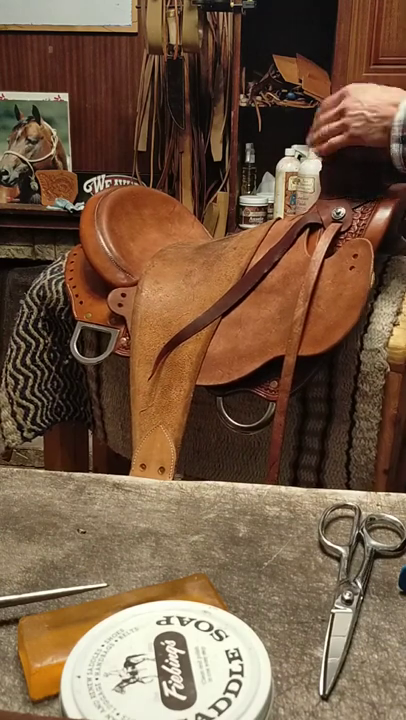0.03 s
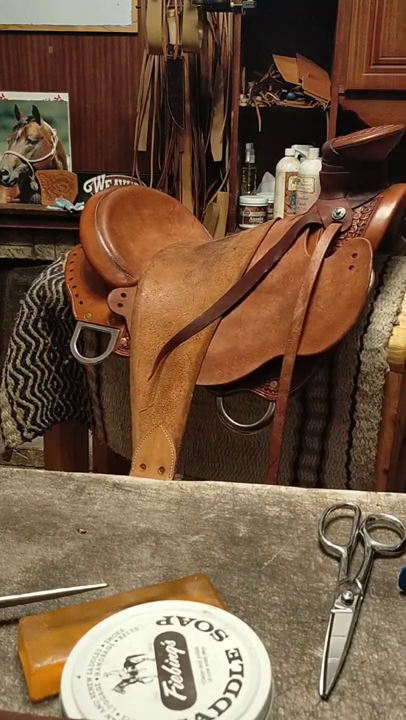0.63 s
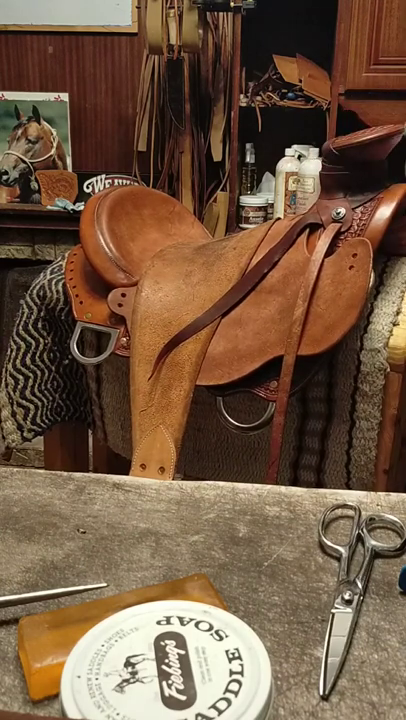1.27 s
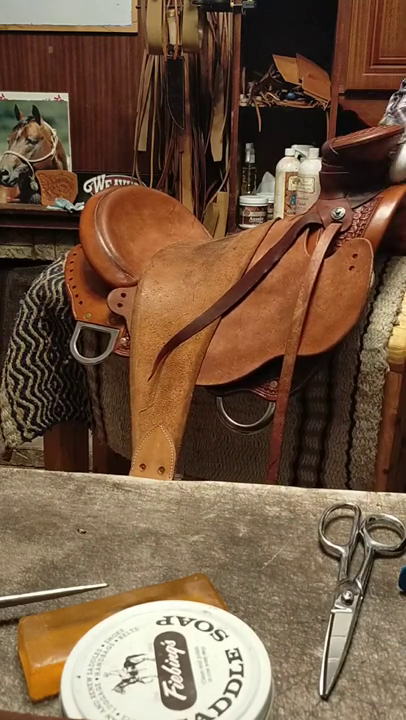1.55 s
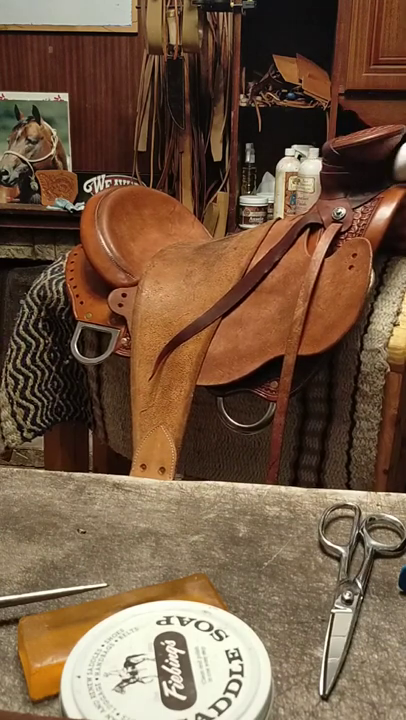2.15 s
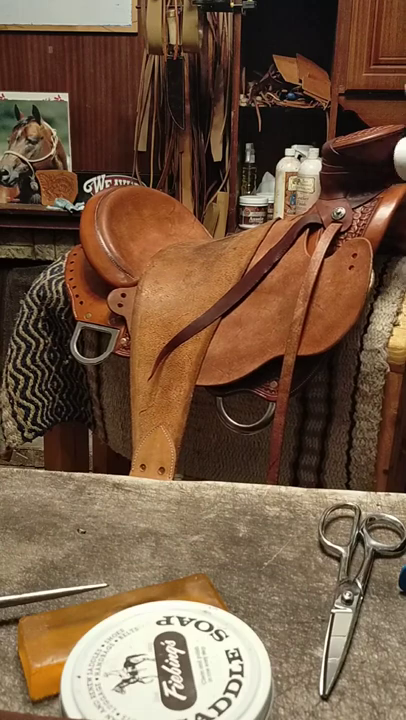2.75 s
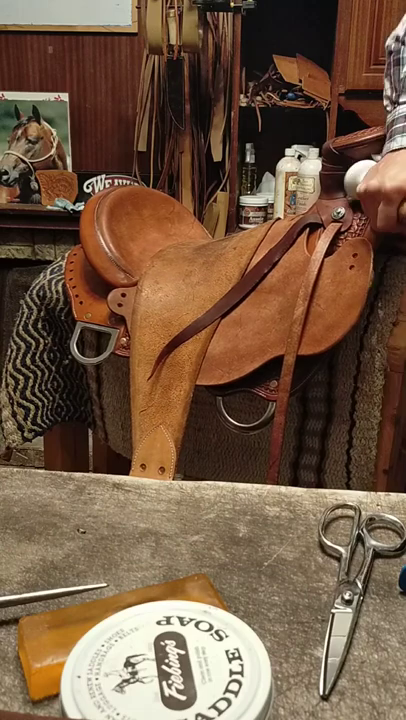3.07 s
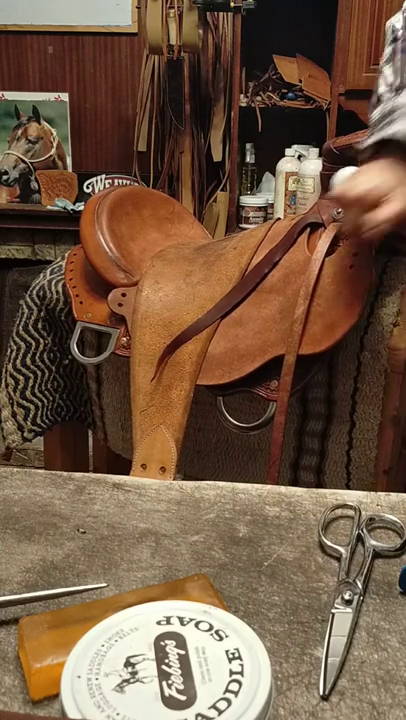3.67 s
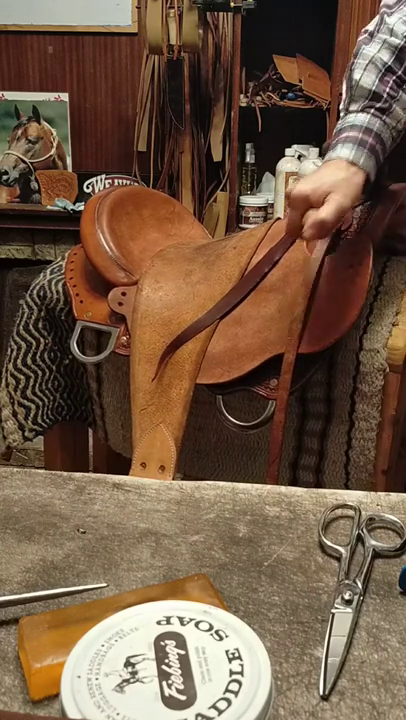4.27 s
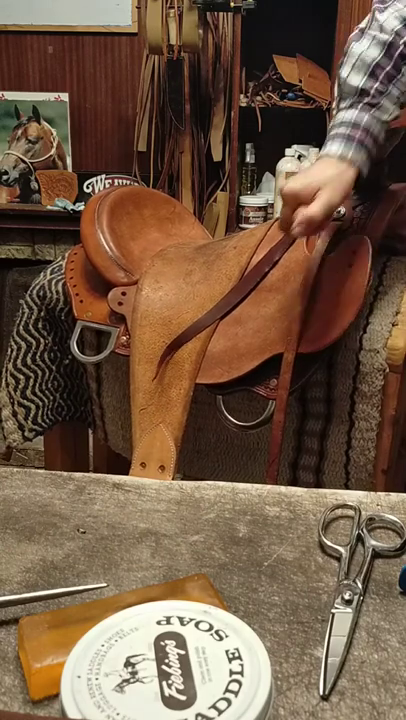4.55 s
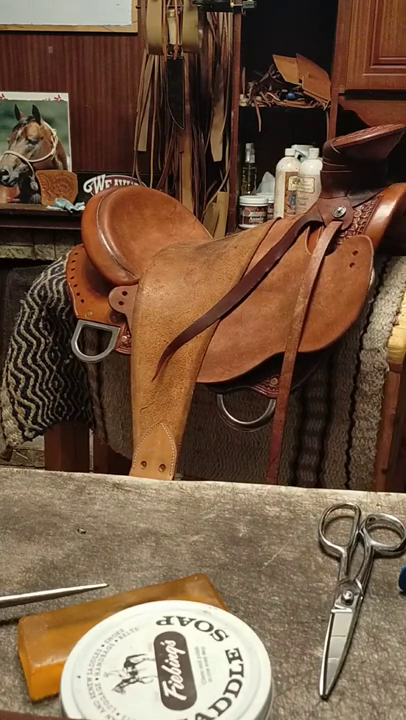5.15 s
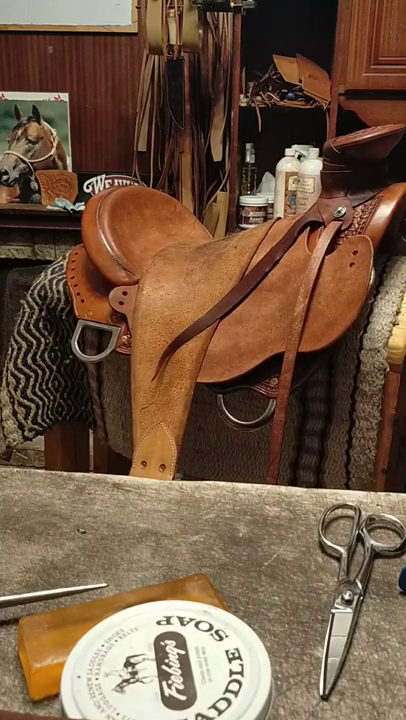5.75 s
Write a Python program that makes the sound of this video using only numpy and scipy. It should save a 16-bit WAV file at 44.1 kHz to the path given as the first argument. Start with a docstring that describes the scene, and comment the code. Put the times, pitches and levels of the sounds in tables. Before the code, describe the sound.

A hard knob taps a leather saddle about a dozen times, hollow knocks growing louder and turning into slaps in a small room.

```python
"""In a small workshop, a doorknob taps a leather saddle: first on the horn, which knocks hollowly,
then along the skirt (the side flap), which slaps. Every blow thuds through the saddle and rocks its
stand, and most of the sound reaches the microphone by bouncing around the room.
A sleeve swishes before the taps, and there are soft bumps and rustles over a quiet hiss."""
import sys
import numpy as np
from scipy import signal
from scipy.fft import rfft, irfft
from scipy.io import wavfile

SR = 44100
rng = np.random.default_rng(int(sys.argv[2]) if len(sys.argv) > 2 else 0)


def log_audio(samples):
    """Write samples as a 16-bit WAV file to the path given in sys.argv[1]."""
    # one column per channel
    frames = np.atleast_2d(samples).T
    # limit to full scale, then quantise
    limited = np.clip(frames, -1, 1)
    pcm = np.round(limited * 32767).astype(np.int16)
    wavfile.write(sys.argv[1], SR, pcm)


N = 261072
TIME = np.arange(N) / SR  # seconds since the start
AGE = np.arange(SR * 7 // 10) / SR  # seconds since a blow

# faint, dry, electrical-sounding ticks (time [s], peak level [dB])
TICK_TIMES = [(.097, -58), (.48, -53), (.543, -56), (0.606, -65), (0.687, -67), (.886, -65), (.923, -66),
              (.982, -68)]
# arm movements (time of top speed [s], rise time [s], rustle level [dB], swish level [dB])
ARM_MOVES = [(0.01, 0.088, -67.5, -72), (.245, .035, -81, -69), (.348, 0.034, -62.5, -54),
             (.41, 0.038, -64.5, -82), (1.1, 0.01, -88, -94), (4.75, 0.99, -77.5, -94),
             (5.32, 0.05, -82.5, -92), (5.4, 0.0098, -82, -76), (5.77, 0.086, -84, -88)]
# soft handling bumps (time [s], level [dB], weight [0 light knock to 1 slow heavy push])
SOFT_BUMPS = [(0.282, -68, 0.65), (.395, -63.5, 1), (.711, -66, 0.09), (.812, -57, 0.49), (1.203, -71, .8),
              (5.239, -76.5, 0), (5.553, -66, 0), (5.592, -59.5, .12)]
# the loose skirt falling back after the knob lifts (time [s], level [dB], scuff level [dB])
SKIRT_FALLS = [(4.138, -55, -84), (4.765, -54, -85), (4.855, -65.5, -73.5), (4.982, -66, -70)]
# hard first contacts of the knob (time [s], level [dB], pitch [Hz], half length [s])
HARD_CONTACTS = [(1.191, -60.5, 1520, 0.001), (1.287, -49.5, 1030, 0.00086), (1.501, -53, 900, 0.00066),
                 (1.727, -46.5, 1400, 0.00027), (1.9557, -38, 1370, 0.00069), (2.197, -42.5, 1310, 0.00087),
                 (2.419, -46.5, 1220, 0.00085), (3.2462, -28.5, 1810, 0.00083),
                 (3.6124, -38.5, 1410, 0.00033), (3.617, -23.5, 1170, 0.00043),
                 (3.9914, -22.5, 1410, 0.00062), (4.316, -16.5, 1360, .00054), (4.6097, -43, 1190, 0.00061),
                 (4.614, -24, 1420, 0.00038)]
# hard contacts are heard more directly than light ones (contact level [dB], room level [dB])
CONTACT_ROOM_LEVELS = [(-60, -78), (-48, -54.5), (-18, -49.5)]
# blows of the knob (time [s], strength [dB], place [0 top of the horn to 1 far skirt],
# pitch the spot favours [Hz], hollowness [0-1])
BLOWS = [(1.2832, -18, .15, 430, 0.2), (1.5, -7, 0.12, 429, .25), (1.736, -3.5, 0.06, 432, 0.26),
         (1.978, 0, 0.05, 434, 0.13), (2.2221, 0.5, 0.17, 433, 0.13), (2.4392, 2, 0.09, 411, 0.48),
         (2.909, -4.5, 0.31, 378, 0.6), (3.249, 2.5, 0.03, 383, 1), (3.6177, 4.5, 0.32, 367, 0.94),
         (3.9919, 1.5, 0.76, 457, 0.2), (4.3159, 5, 0.89, 550, 0.6), (4.6134, 1, 0.82, 543, 0.35)]

# the tones of the horn's own knock (pitch [Hz], relative level [dB])
HORN_TONES = [(437, -0.5), (170, -12.5), (275, -11), (561, -19.5), (911, -19.5)]
# Ringing tones (pitch [Hz], relative level [dB], time to fade by 60 dB [s])
RING_TONES = [(221.2, -5.5, 0.35), (304.5, -6.5, 0.21), (377.5, -2, 0.29), (410, -3, 0.26),
              (459, -5.5, 0.33), (553, -23, .28)]  # the long ring a knock leaves in saddle and room
THUD_TONES = [(62.7, -16, 0.67), (75.9, -5.5, 0.37), (123.05, -2.5, 0.44), (141.3, 4.5, 0.34),
              (172.5, -13.5, 0.56), (205.3, -14.5, 0.21)]  # the low thud of saddle and room
SMACK_TONES = [(890, -4.5, 0.32), (1260, 8, 0.08), (1383, 5, 0.12), (1528, 2, 0.18), (1652, -2.5, 0.38),
               (1802, -7, 0.42), (1920, -7.5, 0.43), (2310, -11.5, 0.46), (2972, -13, 0.29),
               (3310, -7.5, 0.12)]  # tones that stand out in a smack

# Tone curves: how strong each pitch is, from low to high (frequency [Hz], relative level [dB])
HISS_CURVE = [(20, 5), (35, -0.5), (60, -22), (130, -15.5), (220, -11.5), (450, -14.5), (800, -23),
              (1700, -19.5), (3500, -25), (7000, -30), (15500, -29)]  # still room and microphone hiss
TICK_CURVE = [(3500, -35), (5200, 5), (7800, 0), (11000, -27)]  # a tiny dry tick
RUSTLE_CURVE = [(40, -4.5), (130, 3), (270, -10.5), (500, -1), (750, -6.5), (950, 1), (1250, -1),
                (1750, -2), (2800, -10), (5000, -17.5), (8000, -21.5), (15500, -23)]  # rubbing cloth
SWISH_CURVE = [(300, -32), (900, -4), (1400, -4.5), (1900, 5.5), (2700, -3), (3600, -2.5), (5000, -5.5),
               (8000, -12), (11000, -19), (15500, -9.5)]  # a quickly pulled sleeve
RUMBLE_CURVE = [(12, -6), (30, 5), (55, -11.5), (90, -11.5), (200, -32), (600, -61)]  # a deep shudder
FLAP_CURVE = [(300, -22), (550, 0), (850, 2), (1200, 2), (1700, -0.5), (2200, -2.5), (2700, -15),
              (4000, -25), (8000, -32)]  # loose leather
BODY_CURVE = [(25, -16), (45, -0.5), (130, 1.5), (200, 1.5), (320, -1.5), (450, -1), (620, -9),
              (850, -17.5), (1400, -52)]  # the low, full part of a blow
CLOP_CURVE = [(350, -32), (520, 11.5), (620, 6), (900, -1.5), (1100, -3.5), (1800, -31)]  # a hollow spot
SMACK_CURVE = [(350, -32), (600, -6), (850, -0.5), (1300, 0.5), (1700, -1), (2200, -3), (2800, -9.5),
               (3500, -11), (5000, -32), (9000, -40)]  # slapped leather
CRACK_CURVE = [(2000, -33), (3300, 13), (4300, 7), (5400, 9), (6500, 0), (8000, 2), (12000, -21)]  # the sharp edge of a blow
TREBLE_CURVE = [(1500, -27), (2600, 6.5), (3400, 4), (5000, 3), (6500, -1.5), (10000, -8), (15500, -2)]  # the highest, hissy part of a blow
MIC_CURVE = [(20, 5.5), (6000, -2.5), (6700, -3.5), (7800, 1), (9000, -5.5), (10200, 1.5), (11500, -1),
             (14200, 4.5), (15500, -4)]  # what the microphone lifts and dips

# Base levels for the parts of a blow (on the horn [dB], on the skirt [dB])
KNOCK_DB, RING_DB, THUD_DB = (-29.5, -50.5), (-36, -51.5), (-39.5, -36)
BODY_DB, CLOP_DB, SMACK_DB = (-40.5, -44.5), (-43, -42.5), (-52, -44.5)
TONES_DB, CRACK_DB, TREBLE_DB = (-46, -38.5), (-66, -56), (-58.5, -55)
# The padded horn answers slowly, the skirt abruptly (on the horn [s], on the skirt [s])
RISE_S, TREBLE_RISE_S = (0.0071, 0.0035), (0.012, 0.004)
HOLD_S, BODY_HOLD_S = (0.039, 0.028), (0.035, 0.029)
THUD_GROWTH, TREBLE_GROWTH = 0.56, 0.92  # dB gained per dB of strength: light taps are mostly thud


def undb(db):
    """Turn decibels into a number to multiply by."""
    return 10 ** (np.asarray(db) / 20)


def unit(x):
    """Scale a sound to an average (rms) size of 1."""
    return x / np.sqrt(np.mean(x ** 2))


def between(pair, share):
    """The value a share of the way from the first of a pair to the second."""
    return pair[0] + (pair[1] - pair[0]) * np.clip(share, 0, 1)


def fade(t, t60):
    """A smooth fade that is 60 dB down after t60 seconds."""
    return undb(-60 * t / t60)


def swell(s, rise_s, fall_s):
    """A smooth rise to 1 at time s, then a fade."""
    t = TIME - s
    return np.exp(-(np.minimum(t, 0) / rise_s) ** 2 - np.maximum(t, 0) / fall_s)


def colour(x, curve):
    """Make each frequency louder or softer, following a tone curve."""
    hz, db = np.transpose(curve)
    freqs = np.maximum(np.fft.rfftfreq(len(x), 1 / SR), 1)
    gains = undb(np.interp(np.log(freqs), np.log(hz), db))
    return irfft(rfft(x) * gains, len(x))


def noise(curve, size):
    """Noise shaped by a tone curve, with an average size of 1."""
    return unit(colour(rng.standard_normal(size), curve))


def add(out, s, x):
    """Mix x into out, starting at s seconds."""
    start = max(int(s * SR), 0)
    out[start:start + len(x)] += x[:N - start]


def tone(hz, detune):
    """A pure tone, slightly off pitch by a random amount."""
    return np.sin(2 * np.pi * hz * (1 + detune * rng.standard_normal()) * AGE)


def ring(tones, rise_s, detune):
    """Tones build up and fade; each blow lands elsewhere and shifts their pitch a little."""
    ringing = sum(undb(db) * fade(AGE, t60) * tone(hz, detune) for hz, db, t60 in tones)
    ringing *= 1 - np.exp(-(AGE / rise_s) ** 2)
    return ringing / np.abs(ringing).max()


def echoes(curve, rise_s, hold_s, t60, grain_db=1.5):
    """Room echoes pile up, stay level while the first walls answer, then die away."""
    uneven = undb(grain_db * np.repeat(rng.standard_normal(len(AGE) // 63), 63))
    since_hold = np.logaddexp(0, (AGE - hold_s) * 100) / 100  # near 0 until the hold ends
    shape = (1 - np.exp(-AGE / rise_s)) * fade(since_hold, t60)
    wash = colour(rng.standard_normal(len(AGE)) * uneven, curve) * shape
    return unit(wash) * np.sqrt(np.mean(shape ** 2))


def tick():
    """One tiny dry tick with a peak of 1."""
    pulse = colour(signal.unit_impulse(128, "mid"), TICK_CURVE)
    return pulse / pulse.max()


def background(hiss_db=-76.5, whine_hz=1480, whine_s=5.56, whine_db=-78):
    """A steady hiss, with faint, dry, electrical-sounding ticks and a brief faint whine over it."""
    out = undb(hiss_db) * noise(HISS_CURVE, N)
    whine_curve = [(whine_hz / 1.25, -45), (whine_hz, 0), (whine_hz * 1.25, -45)]
    out += undb(whine_db) * swell(whine_s, rise_s=0.2, fall_s=0.023) * noise(whine_curve, N)
    for s, db in TICK_TIMES:
        add(out, s - len(tick()) / 2 / SR, undb(db) * tick())
    return out


def sleeve(rest_db=-84.5, flutter_db=1.1, settle=1.7, swish_fall_s=0.038):
    """Cloth rubs unevenly as the arm moves, then settles; a quick pull swishes brightly."""
    wobble = np.interp(TIME, np.linspace(0, N / SR, 300), rng.standard_normal(300))
    rustle = sum(undb(db) * swell(s, rise_s, settle * rise_s) for s, rise_s, db, _ in ARM_MOVES)
    swish = sum(undb(db) * swell(s, rise_s, swish_fall_s) for s, rise_s, _, db in ARM_MOVES)
    cloth = (undb(rest_db) + rustle) * noise(RUSTLE_CURVE, N) + swish * noise(SWISH_CURVE, N)
    return undb(flutter_db * wobble) * cloth


def bumps(rumble_db=(-12, 11), body_db=(3, -13), flap_db=(-3.5, -11), treble_db=(-15, -24)):
    """Dull bumps blurred by the room. Pairs run from light to heavy: heavier is slower and lower."""
    out = np.zeros(N)
    for s, db, weight in SOFT_BUMPS:
        rise_s = between((0.004, 0.016), weight ** 2)
        add(out, s, undb(db + 3) * ring(THUD_TONES, rise_s=0.012, detune=0.071))
        for curve, pair in ((RUMBLE_CURVE, rumble_db), (BODY_CURVE, body_db),
                            (FLAP_CURVE, flap_db), (TREBLE_CURVE, treble_db)):
            blur = echoes(curve, rise_s, hold_s=0.024, t60=0.3)
            add(out, s, undb(db + between(pair, weight)) * blur)
    return out


def skirt_flaps(body_db=-6, thud_db=-8, tones_db=2):
    """Loose leather slaps back lightly on the saddle and rings with the tones of a smack."""
    out = np.zeros(N)
    for s, db, scuff_db in SKIRT_FALLS:
        add(out, s, undb(db + thud_db) * ring(THUD_TONES, rise_s=0.024, detune=0.034))
        add(out, s, undb(db + tones_db) * ring(SMACK_TONES, rise_s=0.008, detune=0.0088))
        for curve, part_db in (BODY_CURVE, db + body_db), (FLAP_CURVE, db), (TREBLE_CURVE, scuff_db):
            add(out, s, undb(part_db) * echoes(curve, rise_s=0.0046, hold_s=0.032, t60=0.26))
    return out


def leather_creaks(count=5, delay_s=(0.06, 0.18), db=-63, spread_db=2.5):
    """Pressed leather springs back after each blow with a few tiny dry ticks."""
    out = np.zeros(N)
    for s, strength, *_ in BLOWS:
        for when, size in zip(rng.random(count), rng.standard_normal(count)):
            add(out, s + between(delay_s, when), undb(db + strength + spread_db * size) * tick())
    return out


def saddle_stand(hz=29.4, t60=1.43, rise_s=0.16, sway_db=-12.5, shudder_db=-24):
    """Each blow makes the stand shudder and sets it rocking, very low and for a long time."""
    out = np.zeros(N)
    sway = np.sin(2 * np.pi * hz * TIME) * fade(TIME, t60) * (1 - np.exp(-TIME / rise_s))
    for s, strength, place, *_ in BLOWS:
        add(out, s, undb(between(THUD_DB, place) + THUD_GROWTH * strength + sway_db) * sway)
        # a blow on top of the horn goes straight down into the stand
        shudder = echoes(RUMBLE_CURVE, rise_s=0.01, hold_s=0.1, t60=0.53)
        add(out, s + 0.011, undb(between(KNOCK_DB, place) + strength + shudder_db) * shudder)
    return out


def knob_clicks(snap_db=-20, flutter_db=-17, echo_s=0.0054, echo_db=-11, lead_s=0.004):
    """A hard contact makes a quick pulse, a flutter of leather, one near echo and a wash of room."""
    out = np.zeros(N)
    t = AGE - lead_s  # 0 at the middle of the pulse
    for s, db, hz, width_s in HARD_CONTACTS:
        # the shorter the contact on stiff leather, the more overtone and snap it has
        overtone = undb(-24) * (0.00031 / width_s) ** 3 * np.cos(2 * np.pi * 2.7 * hz * t)
        pulse = (np.cos(2 * np.pi * hz * t) + overtone) * np.exp(-(t / width_s) ** 2)
        flutter = undb(flutter_db) * noise(SMACK_CURVE, len(t)) * fade(np.abs(t), t60=0.045)
        snap_gain = undb(snap_db) * (0.0004 / width_s) ** 2
        snap = snap_gain * noise(TREBLE_CURVE, len(t)) * fade(np.abs(t), t60=0.0055)
        direct = undb(db) * (pulse + (flutter + snap) * (t > -width_s))
        arrival = s + 0.00055 - lead_s
        add(out, arrival, direct)
        add(out, arrival + echo_s, undb(echo_db) * direct)
        room_db = np.interp(db, *np.transpose(CONTACT_ROOM_LEVELS))
        curve = [(hz / 4, -30), (hz / 2.7, -4), (hz, 0),
                 (hz * 1.52, -3), (hz * 2.17, -15), (hz * 5, -35)]
        add(out, s, undb(room_db) * echoes(curve, rise_s=0.0058, hold_s=0.016, t60=0.33))
    return out


def horn_knock(spot_hz, follow=0.3, rise_s=0.0018, contact_s=0.015, t60=0.017):
    """The horn sounds while the knob presses on it, then stops quickly."""
    stretch = (spot_hz / HORN_TONES[0][0]) ** follow  # the pitch partly follows the struck spot
    tones = sum(undb(db) * tone(hz * stretch, detune=0.009) for hz, db in HORN_TONES)
    return tones * (1 - np.exp(-AGE / rise_s)) * fade(np.maximum(AGE - contact_s, 0), t60)


def knob_taps(favour_db=8, favour_width_hz=40, hollow_body_db=-6):
    """The knob sinks into the leather: the horn knocks, the saddle thuds and the room answers."""
    out = np.zeros(N)
    for s, strength, place, spot_hz, hollow in BLOWS:
        def mix(pair_db, sound, delay_s=0, growth=1):
            """Add one part of this blow; place and strength set how loud it is."""
            add(out, s + delay_s, undb(between(pair_db, place) + growth * strength) * sound)

        rise_s, hold_s = between(RISE_S, place), between(HOLD_S, place)
        mix(KNOCK_DB, horn_knock(spot_hz), delay_s=0.001)
        # the spot that is struck decides which tones ring loudest
        favoured = [(hz, db + favour_db * np.exp(-((hz - spot_hz) / favour_width_hz) ** 2), t60)
                    for hz, db, t60 in RING_TONES]
        mix(RING_DB, ring(favoured, rise_s=0.016, detune=0.0036), delay_s=0.024)
        mix(THUD_DB, ring(THUD_TONES, rise_s=0.034, detune=0.0062), delay_s=0.0053, growth=THUD_GROWTH)
        # a hollow spot gives up some body for a clop
        body = echoes(BODY_CURVE, rise_s=0.0021, hold_s=between(BODY_HOLD_S, place), t60=0.37)
        clop = echoes(CLOP_CURVE, rise_s=0.00071, hold_s=0.016, t60=0.28)
        mix(BODY_DB, undb(hollow_body_db * hollow) * body, delay_s=0.004)
        mix(CLOP_DB, hollow * clop, delay_s=0.003)
        # the bright slap, strongest on the skirt
        mix(SMACK_DB, echoes(SMACK_CURVE, rise_s, hold_s, t60=0.36), delay_s=0.003)
        mix(TONES_DB, ring(SMACK_TONES, rise_s=0.008, detune=0.006))
        mix(CRACK_DB, echoes(CRACK_CURVE, rise_s=0.0054, hold_s=0.025, t60=0.25))
        treble = echoes(TREBLE_CURVE, between(TREBLE_RISE_S, place), hold_s, t60=0.37)
        mix(TREBLE_DB, treble, growth=TREBLE_GROWTH)
    return out


def scene():
    """Everything added together at the one microphone on the bench."""
    blows = knob_taps() + knob_clicks() + leather_creaks() + saddle_stand()
    return (blows + bumps() + skirt_flaps() + sleeve() + background())[None]


def record(dry):
    """The microphone lifts the bass, dips and lifts the high treble, and cuts off the very top."""
    heard = colour(dry[0], MIC_CURVE)[None]
    top_cut = signal.ellip(10, 0.2, 70, 15700, fs=SR, output="sos")  # keeps what is below 15700 Hz
    return signal.sosfilt(top_cut, heard)


dry = scene()
out = record(dry)
log_audio(out)
```